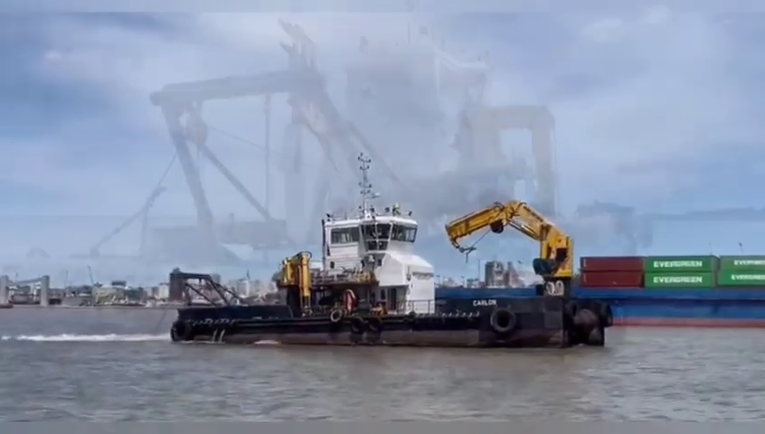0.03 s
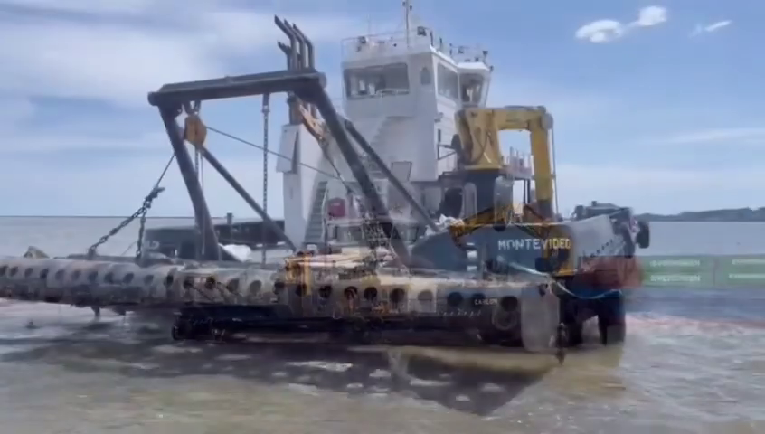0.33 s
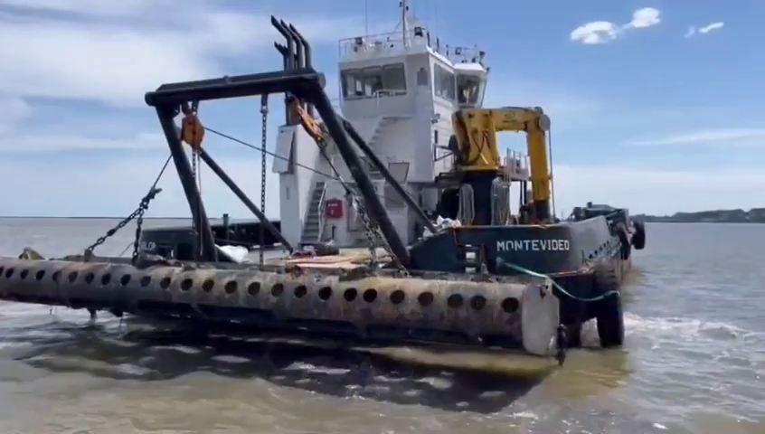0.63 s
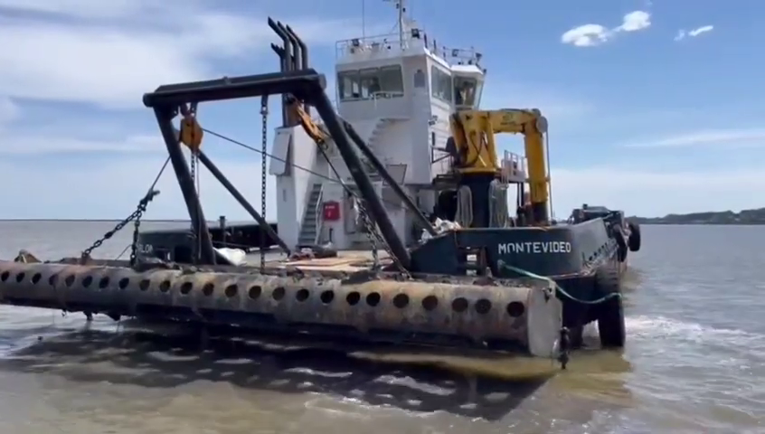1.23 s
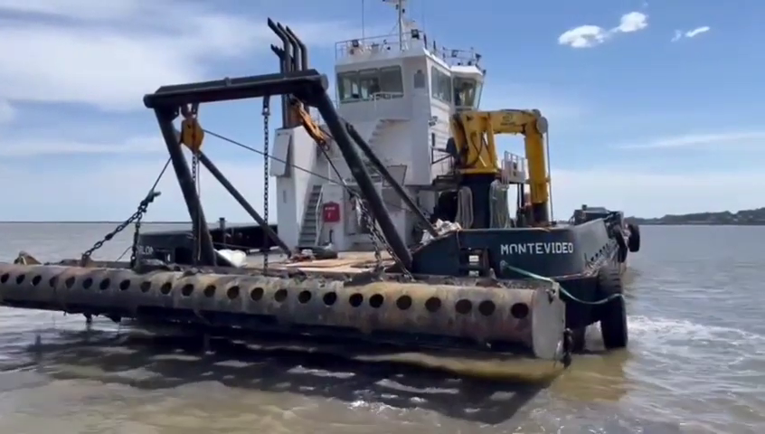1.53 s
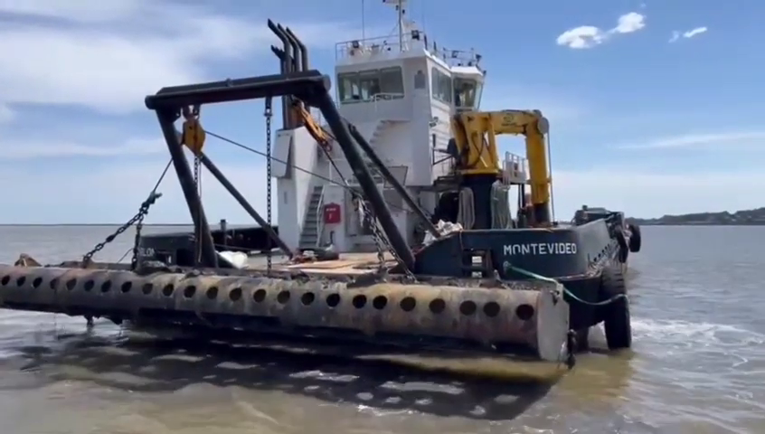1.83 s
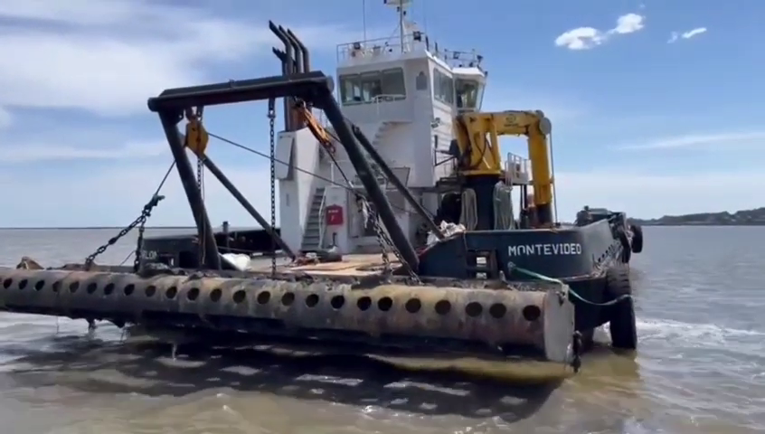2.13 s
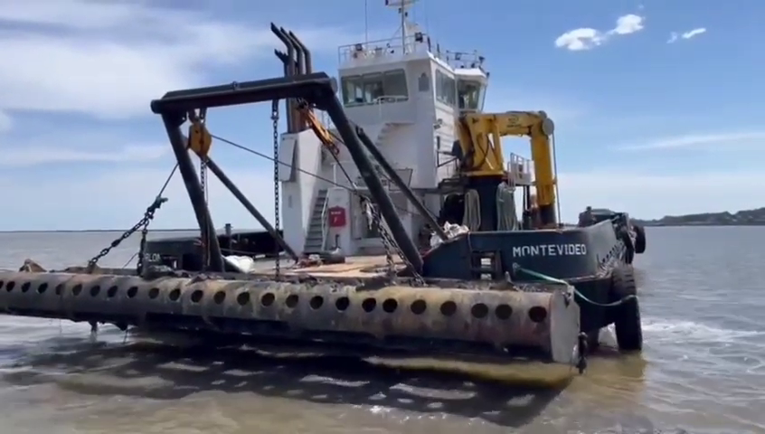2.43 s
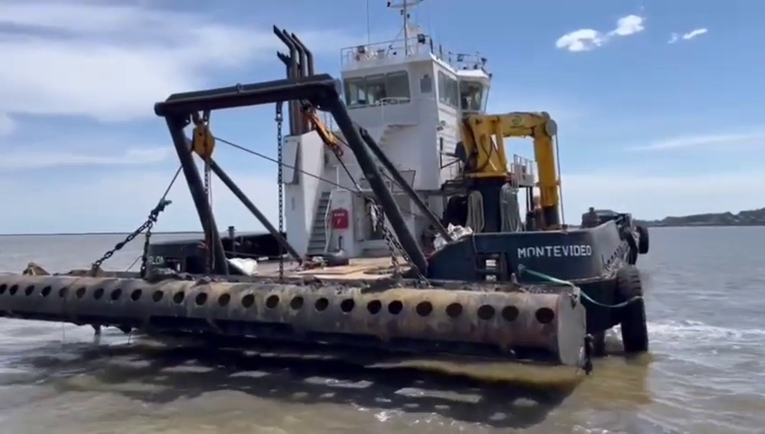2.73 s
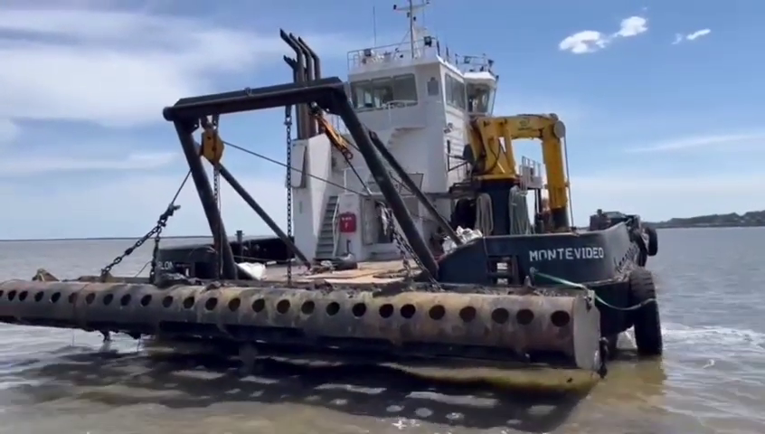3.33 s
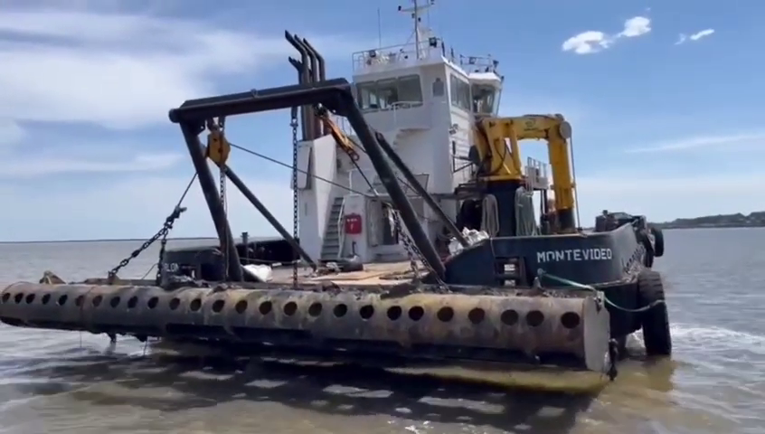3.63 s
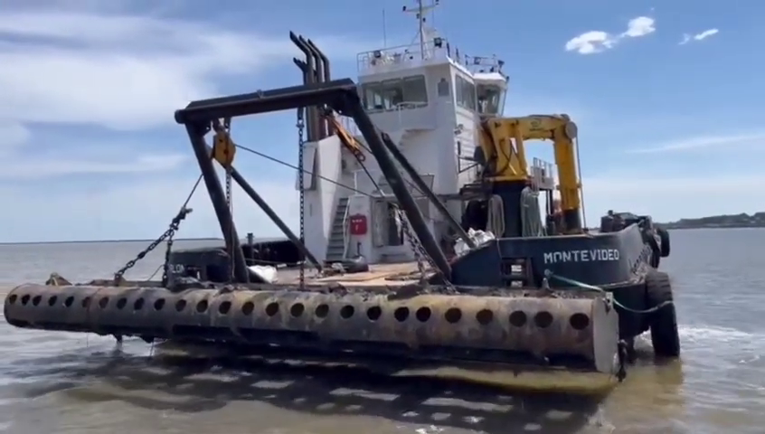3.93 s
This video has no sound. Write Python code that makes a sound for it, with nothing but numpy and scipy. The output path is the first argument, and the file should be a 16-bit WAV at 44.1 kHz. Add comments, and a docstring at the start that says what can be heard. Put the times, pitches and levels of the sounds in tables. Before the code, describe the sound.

A work boat's engine revs up and settles into a deep hum, with water lapping.

```python
"""A work boat's main engine, close by on harbour water, revs up, overshoots and settles into a deep hum.
Its firing note has overtones that boom at the exhaust pipe's resonance, over a rumble of engine and wind.
Its droning generator and roaring machinery fade in as a farther boat's knocking diesel exhaust fades out.
Water washes along the hull, fizzing with spray and ringing bubbles, and small waves slap it."""
import sys
import numpy as np
from scipy import signal
from scipy.fft import rfft, irfft
from scipy.io import wavfile
from scipy.ndimage import uniform_filter1d

SR = 44100
rng = np.random.default_rng(int(sys.argv[2]) if len(sys.argv) > 2 else 0)


def wrap_up_sound(samples):
    """Save the sound to the file named by the first command line argument, as 16-bit audio."""
    columns = np.atleast_2d(samples).T
    # keep every value between -1 and 1, then stretch to whole-number steps
    tamed = np.clip(columns, -1, 1)
    steps = np.round(tamed * 32767).astype(np.int16)
    wavfile.write(sys.argv[1], SR, steps)


N = 176400

# stereo width of the near sounds, side over mid (f/Hz, level/dB)
NEAR_WIDTH = [(60, -17), (130, -9.5), (350, -12), (620, -7), (1120, -2), (2000, -4), (4000, -9.5),
              (7800, 8), (11000, -5)]


def undb(db):
    """Amplitude ratio of a level in decibels."""
    return 10 ** (np.asarray(db) / 20)


def unit(x):
    """Normalisation to rms 1."""
    return x / np.sqrt(np.mean(x ** 2))


def clock():
    """Time axis, t/s."""
    return np.arange(N) / SR


def curve(rows):
    """Linear interpolation of (t/s, value) rows."""
    return np.interp(clock(), *np.array(rows, float).T)


def colour(x, rows):
    """Spectral shaping by a gain curve through (f/Hz, level/dB) rows."""
    hz, db = np.array(rows, float).T
    f = np.maximum(np.arange(N // 2 + 1) * SR / N, 1)
    return irfft(rfft(x) * undb(np.interp(np.log(f), np.log(hz), db)), N)


def resonate(x, hz, width):
    """Second-order resonance with gain 1 at its centre."""
    return signal.lfilter(*signal.iirpeak(hz, hz / width, fs=SR), x)


def walk(rate):
    """Smooth random fluctuation with standard deviation near 1."""
    k = int(SR / rate)
    steps = np.repeat(rng.standard_normal(N // k + 2), k)
    return np.sqrt(2) * uniform_filter1d(uniform_filter1d(steps, k), k)[:N]


def spread(mid, side, width):
    """Mid-side stereo: an uncorrelated side signal is added on the left and subtracted on the right."""
    return mid + colour(side, width) * np.array([[1], [-1]])


def noise(width):
    """Gaussian noise, partly correlated between left and right."""
    return spread(*rng.standard_normal((2, N)), width)


def tone(hz, waver_db, drift_rad):
    """A sinusoid under random amplitude and phase modulation."""
    phase = 2 * np.pi * (np.cumsum(hz * np.ones(N)) / SR + rng.random()) + drift_rad * walk(5.05)
    return np.sqrt(2) * np.sin(phase) * undb(waver_db * walk(9.6))


def splash(start, decay, attack):
    """Impact envelope: a quick rise and an exponential decay, times in seconds."""
    age = np.maximum(clock() - start, 0)
    return (1 - np.exp(-age / attack)) * np.exp(-age / decay)


def machinery():
    """A generator at constant speed gives a line spectrum; machines add whines and, with wind, a roar."""
    # generator lines (multiple of the working cycle, level/dB)
    lines = [(3, -16), (6, 0), (12, -16), (14, -9), (15, -11), (17, -16), (21, -16), (31.5, -21)]
    # thin machinery whines (f/Hz, level/dB)
    whines = [(877.5, -54), (1015, -59), (1405, -58.5), (1612, -58.5), (1660, -63)]
    # spectrum of machinery and wind (f/Hz, level/dB)
    roar_spectrum = [(25, 0), (45, 0.5), (95, 11), (150, -4.5), (280, -0.5), (400, -10), (460, -15),
                     (700, -13.5), (950, -22), (1300, -20.5), (1470, -28), (1630, -22.5), (1780, -30),
                     (2200, -30.5), (2600, -36.5), (4000, -39.5), (10000, -79.5)]
    cycle_hz = 12.52
    drone = unit(sum(undb(db) * tone(k * cycle_hz, waver_db=1.5, drift_rad=.44) for k, db in lines))
    whine = sum(undb(db) * np.array([tone(hz, waver_db=2, drift_rad=.8) for _ in range(2)])
                for hz, db in whines)
    roar = unit(colour(noise(NEAR_WIDTH), roar_spectrum)) * undb(.7 * walk(11))
    return undb(-23.5) * drone + whine + undb(-24) * roar


def droplets(per_s, scatter_db):
    """Shot noise: independent droplets make dense clicks of very unequal size."""
    sizes = undb(scatter_db * np.minimum(rng.exponential(size=(2, N)), 5))
    clicks = sizes * rng.standard_normal((2, N)) * (rng.random((2, N)) < per_s / SR)
    return spread(*clicks, NEAR_WIDTH)


def bubbles():
    """Each bubble is a damped oscillator that rings briefly and rises in pitch."""
    per_s, low_hz, high_hz = 420, 1300, 6000
    decay_cycles, pitch_rise = 7, .12
    t = np.arange(SR // 25) / SR
    out = np.zeros((2, N + len(t)))
    for when, pitch, size, pan in rng.random((int(per_s * N / SR), 4)):
        hz = low_hz * (high_hz / low_hz) ** pitch
        decay = t * hz / decay_cycles
        phase = 2 * np.pi * hz * t * (1 + pitch_rise * np.tanh(decay / 10))
        ring = np.sin(phase) * np.exp(-decay) * size ** 2 / np.sqrt(hz)
        start = int(when * N)
        out[:, start:start + len(t)] += np.sqrt([[pan], [1 - pan]]) * ring
    return unit(out[:, :N])


def wavelets():
    """Envelope of small breaking waves: quick surges superpose on a steady flow and drain away."""
    per_s = 19
    surges = sum((.5 + size) * splash((k + late) / per_s, decay=.035, attack=.008)
                 for k, (late, size) in enumerate(rng.random((int(per_s * N / SR), 2))))
    return unit(surges + np.mean(surges) / 2)


def hull_wash():
    """Wavelets modulate the amplitude of fizz and bubbles along the hull."""
    # filter on the fizz, with a notch near 8.5 kHz that is not due to the water (f/Hz, level/dB)
    notched_filter = [(400, -4), (1200, 0), (2500, -1.5), (6500, -7), (8500, -22), (10600, -10.5),
                      (13000, -32)]
    # strength of the wash (t/s, level/dB)
    wash_level = [(0, -53.5), (.7, -52), (.9, -47), (1.1, -48), (1.28, -51), (1.85, -50.5), (2.0, -53.5),
                  (2.15, -51.5), (2.85, -53.5), (3.05, -49.5), (3.3, -51.5), (4, -49)]
    fizz = unit(colour(droplets(per_s=12000, scatter_db=2), notched_filter))
    return (fizz + undb(-5) * bubbles()) * undb(curve(wash_level)) * wavelets()


def hull_slaps():
    """Each wave's impact on the hull is a noise transient: bright spray over a hollow body."""
    # impacts (t/s, spray level/dB, body level/dB, decay time/s)
    slaps = [(.9, -44, -46, .02), (.98, -41, -54, 0.021), (1.053, -39, -41, 0.021),
             (1.195, -37, -36.5, 0.019), (1.375, -45, -47, .015), (1.457, -40, -30.5, 0.022),
             (1.782, -43.5, -43.5, .025), (2.336, -44, -45.5, .015), (2.47, -47, -42, 0.015),
             (2.817, -42, -38, 0.022), (2.958, -44.5, -48, .02), (3.159, -36.5, -38, 0.03),
             (3.325, -46, -44.5, 0.021), (3.546, -36.5, -36, 0.022), (3.85, -46, -37, 0.027),
             (3.932, -42, -49, 0.025)]
    # spectrum of the spray (f/Hz, level/dB)
    spray_spectrum = [(300, -11.5), (1100, -5), (2800, 7.5), (5000, 1), (7000, -15), (11000, -12),
                      (13000, -31)]
    # spectrum of the hollow body (f/Hz, level/dB)
    body_spectrum = [(250, -14.5), (650, 2), (1200, 1.5), (2000, -7), (5000, -32.5)]
    spray = unit(colour(droplets(per_s=6000, scatter_db=2), spray_spectrum))
    body = unit(colour(noise(NEAR_WIDTH), body_spectrum))
    return sum((undb(spray_db) * spray + undb(body_db) * body) * splash(start, decay, attack=.002)
               for start, spray_db, body_db, decay in slaps)


def spray_ticks():
    """Brief impacts have broad spectra: spray lands in sharp ticks, each with a faint patter after it."""
    # single ticks (t/s, level/dB)
    ticks = [(1.008, -38), (1.195, -36), (2.9243, -24.5), (3.1665, -30), (3.668, -43)]
    # spectrum of a tick (f/Hz, level/dB)
    tick_spectrum = [(1500, -14), (3500, -4), (5000, 2), (7800, -6), (10800, 1), (13000, -9)]
    envelope = 0
    for start, db in ticks:
        tick = splash(start, decay=.0013, attack=.0005)
        patter = splash(start, decay=.016, attack=.0013)
        envelope += undb(db) * (tick + undb(-19) * patter)
    return unit(colour(noise(NEAR_WIDTH), tick_spectrum)) * envelope


def far_boat():
    """Pulse excitation: each firing's gas burst knocks and barks in the resonant stack, over a hum."""
    # stack resonances (f/Hz, bandwidth/Hz, level/dB)
    stack_modes = [(543, 156, 5), (678, 74, -3.5), (1095, 110, -9.5), (1760, 220, -7)]
    # overall filter of the bark (f/Hz, level/dB)
    bark_filter = [(60, 3.5), (140, 15.5), (320, 6.5), (500, 1.5), (1950, -4), (2400, -7.5), (6000, -30.5)]
    # spectrum of a knock's sharp edge (f/Hz, level/dB)
    knock_spectrum = [(900, 6.5), (1450, -10), (1850, 9.5), (2100, -11.5), (2300, -1.5), (2600, -8),
                      (2950, 6.5), (3250, -5.5), (3550, 6.5), (3900, -9), (4150, -5.5), (6500, -21.5),
                      (9000, -44)]
    # low hum and steady notes of the stack (f/Hz, level/dB)
    hum_lines = [(50, -2), (102.5, -6), (177, -15), (565, -10.5), (662, -17), (705, -18.5), (1196, -28),
                 (1873, -29), (1912, -30)]
    # stereo width, side over mid (f/Hz, level/dB)
    far_width = [(100, 1), (600, -11), (1120, -2.5), (2000, -7), (3500, -20.5)]
    # fade of the whole boat (t/s, level/dB)
    fade = [(0, 2.5), (.25, 1), (.45, -4), (.65, -9.5), (.8, -19.5), (.95, -59)]
    firing_hz, first_knock_s, weak_db, scatter_db = 52.85, .016, -5, .6
    knock_s, bark_decay_s, steady_hiss, steady_gas = .004, .016, .31, .3
    cycles = (clock() - first_knock_s) * firing_hz + 2
    firing, age = cycles.astype(int), cycles % 1 / firing_hz
    # firings alternate strong and weak
    size = undb(weak_db * (firing % 2) + scatter_db * rng.standard_normal(N // 100)[firing])
    burst = size * age / knock_s * np.exp(2 - 2 * age / knock_s)
    knock = unit(colour((burst + steady_hiss) * noise(far_width), knock_spectrum))
    gas = (size * np.exp(-age / bark_decay_s) + steady_gas) * noise(far_width)
    stack = sum(undb(db) * resonate(gas, hz, width) for hz, width, db in stack_modes)
    bark = unit(colour(stack, bark_filter))
    hum = unit(sum(undb(db) * tone(hz, waver_db=1.5, drift_rad=.72) for hz, db in hum_lines))
    return undb(curve(fade)) * (undb(-37.5) * knock + undb(-24.5) * bark + undb(-23) * hum)


def main_engine():
    """Forced resonance: firing overtones swell as they cross the pipe's mode; engine and wind rumble."""
    # firing rate (t/s, f/Hz)
    firing_rate = [(1.2, 42), (1.35, 50), (1.5, 63.9), (1.62, 72.3), (1.78, 72.5), (1.9, 60.9),
                   (2.05, 53.7), (2.35, 51.3), (2.7, 51.4), (3.1, 52), (3.45, 53.1), (4, 53.5)]
    # strength of the firing note (t/s, level/dB)
    firing_level = [(1.2, -29.5), (1.37, -11), (1.46, -20), (1.62, -13), (1.85, -17.5), (2.13, -12),
                    (2.55, -17), (2.85, -9.5), (3.08, -11), (3.24, -19.5), (3.45, -10.5), (3.75, -9.5),
                    (4, -10.5)]
    # engine orders (multiple of the firing rate, level/dB)
    orders = [(1.5, 1), (2, -.5), (2.5, -7.5), (3.5, -8.5), (4, -16), (6.5, -21), (7.5, -24.5), (10, -24.5)]
    # common gain of these overtones (t/s, level/dB)
    overtone_level = [(1.15, -39), (1.35, -19.5), (1.6, -26.5), (1.85, -36), (2.2, -24), (2.45, -15),
                      (2.75, -17), (3.25, -16), (3.6, -17), (4, -19.5)]
    # spectrum of the low rumble of engine and wind (f/Hz, level/dB)
    rumble_spectrum = [(20, -32.5), (35, -16.5), (50, 0), (85, -0.5), (120, -3), (200, -11.5), (380, -27),
                       (500, -38.5), (1000, -78)]
    # rumble of engine and wind: wind at first, and a gust near 2 s (t/s, level/dB)
    rumble_level = [(.5, -38), (.75, -26), (1.15, -26.5), (1.35, -26.5), (1.7, -23.5), (2.0, -17.5),
                    (2.3, -18.5), (3.2, -19.5), (4, -24)]
    pipe_hz, bandwidth_hz, off_resonance_gain = 104.5, 18, .41
    hz = uniform_filter1d(curve(firing_rate), SR // 20)
    firing = tone(hz, waver_db=0, drift_rad=0)
    overtones = 0
    for multiple, db in orders:
        detuning = 2 * (multiple * hz - pipe_hz) / bandwidth_hz
        pipe_gain = off_resonance_gain + 1 / (1 + detuning ** 2)
        # the second harmonic is steadier; the other orders come from uneven cylinders and waver
        unsteady = .3 if multiple == 2 else 1
        partial = tone(multiple * hz, waver_db=2.5 * unsteady, drift_rad=.6 * unsteady)
        overtones += undb(db) * pipe_gain * partial
    puffs = noise(NEAR_WIDTH) * (1 + firing / 2)  # the noise swells once per firing
    rumble = unit(colour(puffs, rumble_spectrum))
    return (undb(curve(firing_level)) * firing
            + undb(curve(overtone_level)) * overtones
            + undb(curve(rumble_level)) * rumble)


def scene():
    """Superposition of both boats and the water; the machinery fades in."""
    fade_in_s = .8
    fade_in = np.minimum(clock() / fade_in_s, 1)
    boats = far_boat() + fade_in * machinery() + main_engine()
    return boats + hull_wash() + hull_slaps() + spray_ticks()


def record(dry):
    """Soft saturation rounds the highest peaks, and a low-pass filter cuts the top of the treble."""
    ceiling, cutoff_hz = .95, 12200
    rounded = dry / (1 + (dry / ceiling) ** 8) ** (1 / 8)
    return signal.sosfilt(signal.ellip(8, .2, 70, cutoff_hz, fs=SR, output="sos"), rounded)


dry = scene()
out = record(dry)
wrap_up_sound(out)
```